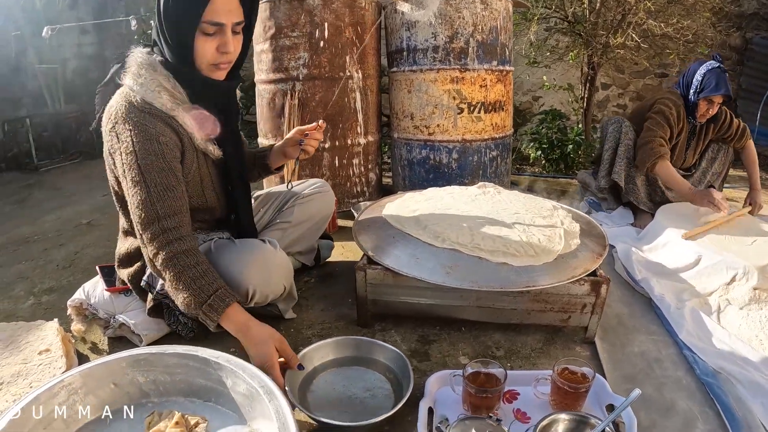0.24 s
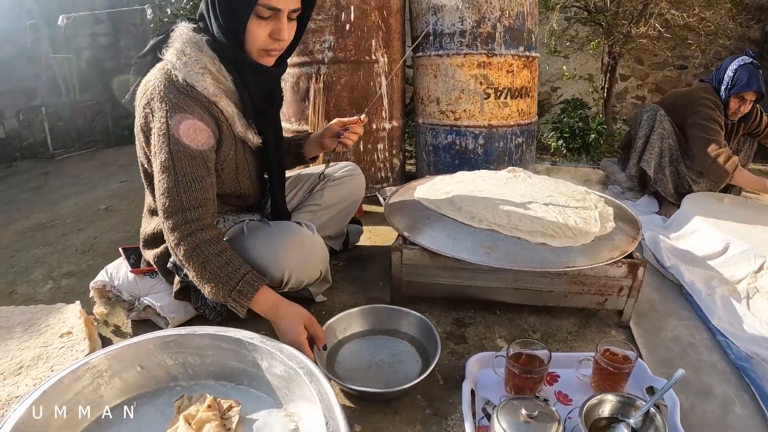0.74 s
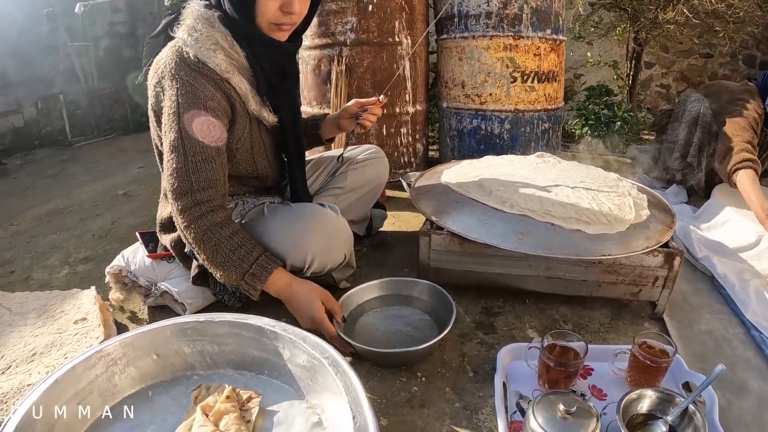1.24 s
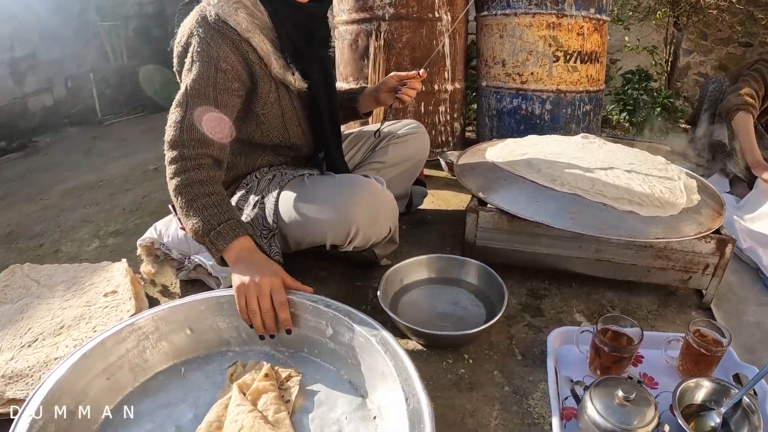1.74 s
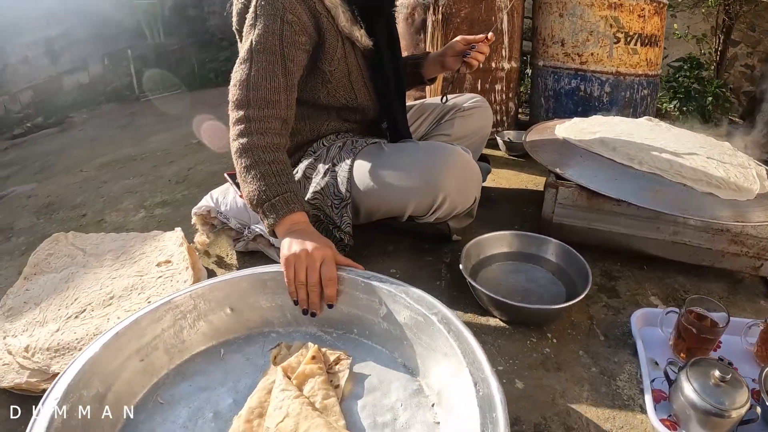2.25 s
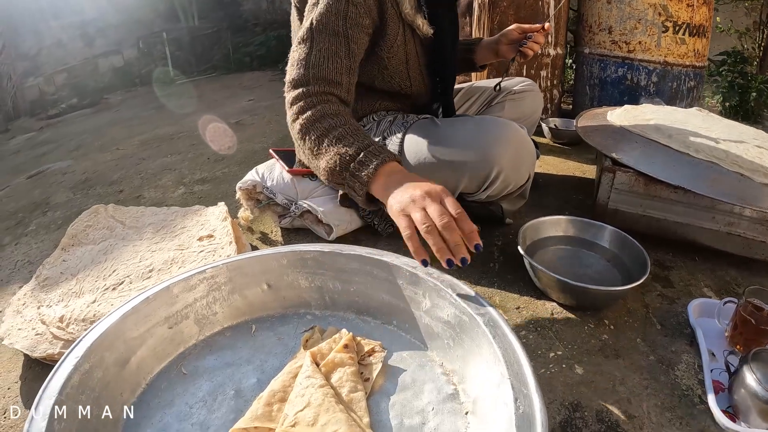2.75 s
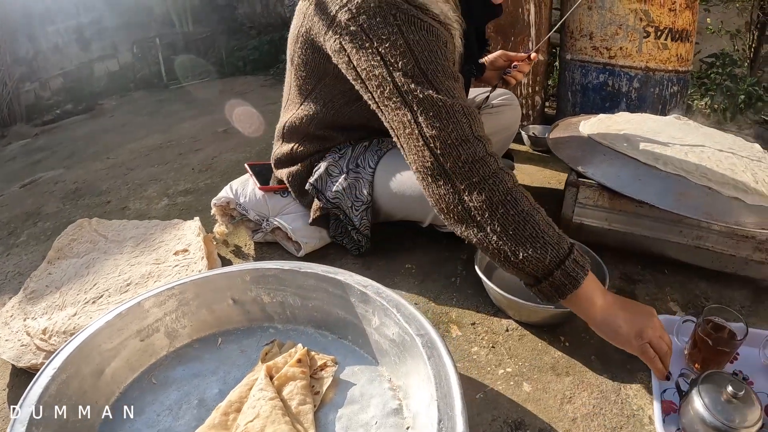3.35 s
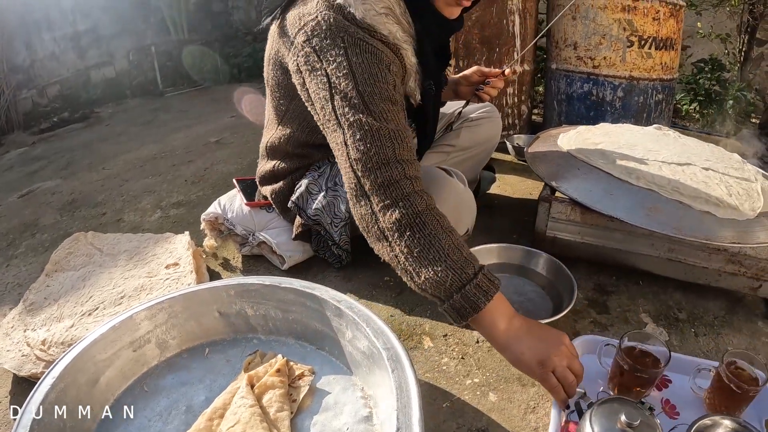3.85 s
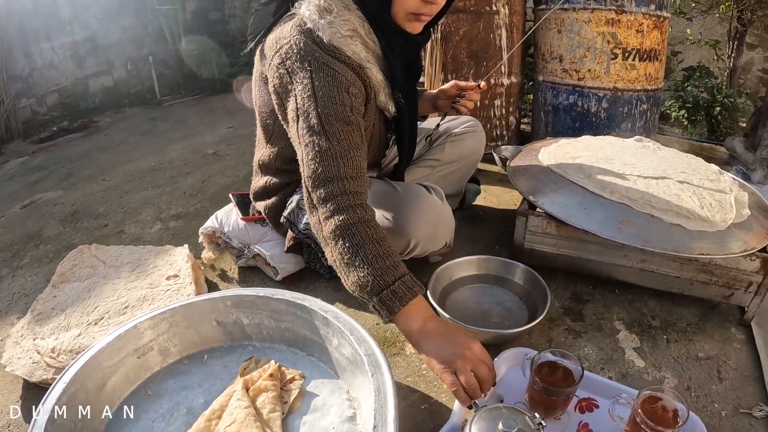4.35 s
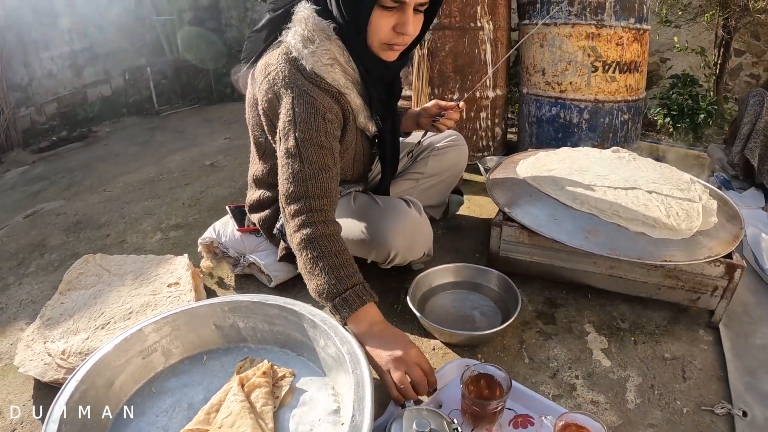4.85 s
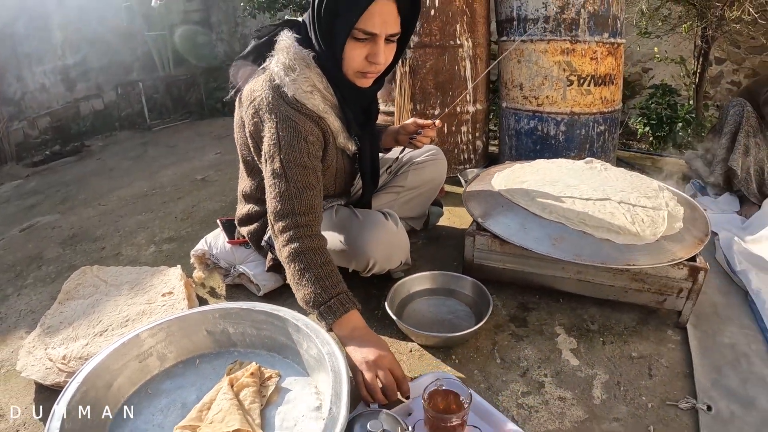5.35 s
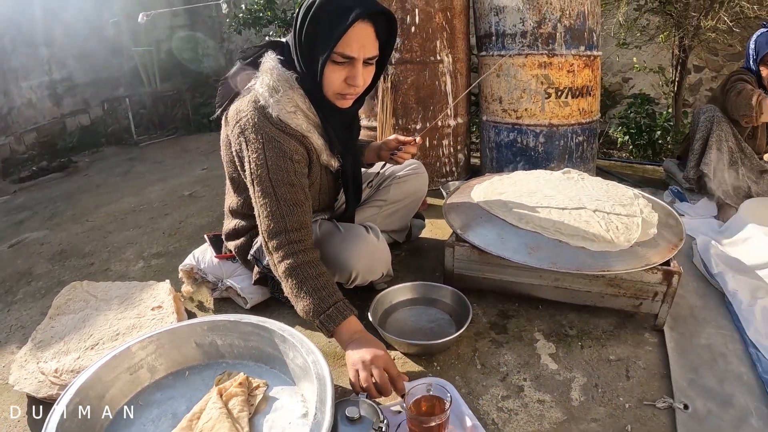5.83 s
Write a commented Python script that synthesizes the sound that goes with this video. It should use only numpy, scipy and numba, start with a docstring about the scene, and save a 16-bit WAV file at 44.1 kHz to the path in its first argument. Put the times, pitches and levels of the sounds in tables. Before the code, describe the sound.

A quiet outdoor yard, heard closely in stereo, with a gas burner's soft hiss gradually fading and an uneven low rumble. From about 0.3 s a thin metal bowl drags over gritty concrete, with bright, ringing catches strongest around 0.65-1.15 s. It lands near 1.2 s with a hollow low clop and brief rumble; a small knock follows at 1.5 s. A faint sleeve or palm brush passes at 1.8-2.05 s. From 2.05 to 2.7 s a wide basin scrapes, lower, broader and rougher, followed by a soft cloth swish around 2.7 s. After a short lull, a tea tray starts moving at 3.3 s, then grates loudly in jerky shoves from 3.6 to 5.2 s, with dull knocks, hollow resonance and thin high edge whistles. Small chirps and ticks come around 5.3 s, a weak scrape follows, and strong rattling scrapes resume from 5.7 s to the end.

```python
"""In a yard beside a gas-fired griddle, a hand drags a metal bowl, then a wide basin, then a tea tray over gritty concrete.
Random grains and sudden catches drive each vessel's broad response and moving resonances; the tray's edge whistles.
Damped low sines make knocks through the ground and dense soft grains a brushing sleeve;
filtered noise makes the burner hiss and low outdoor rumble."""
import sys
import numpy as np
from scipy import signal
from scipy.fft import rfft, irfft
from scipy.io import wavfile
from scipy.ndimage import uniform_filter1d
from numba import njit

SR = 44100
rng = np.random.default_rng(int(sys.argv[2]) if len(sys.argv) > 2 else 0)


def put_to_file(sound):
    """Save the sound as 16-bit audio at rate SR, in the file named by the first command-line argument."""
    columns = np.atleast_2d(sound).T  # one column per channel
    safe = np.clip(columns, -1, 1)
    whole_steps = np.round(safe * 32767)
    wavfile.write(sys.argv[1], SR, whole_steps.astype(np.int16))


N = 268569
TIME = np.arange(N) / SR


def undb(db):
    """Amplitude factor of a level in dB."""
    return 10 ** (np.asarray(db) / 20)


def unit(x):
    """Scales to rms 1."""
    return x / np.sqrt(np.mean(x ** 2))


def noise():
    """White noise, one value per sample."""
    return rng.standard_normal(N)


def band(x, lo_hz, hi_hz):
    """Keeps the band between two frequencies."""
    return signal.sosfilt(signal.butter(2, [lo_hz, hi_hz], "bandpass", fs=SR, output="sos"), x)


def low_pass(x, hz):
    """Gentle first-order low-pass."""
    return signal.lfilter(*signal.butter(1, hz, fs=SR), x)


def curves(table):
    """Fade in dB (0 inside the table, down 60 in 20 ms outside) and the columns at every sample."""
    s, *columns = np.transpose(table)
    fade_db = np.interp(TIME, [s[0] - .02, s[0], s[-1], s[-1] + .02], [-60, 0, 0, -60])
    return fade_db, [np.interp(TIME, s, column) for column in columns]


def colour(x, points, modes=(), size=8192):
    """Causal minimum-phase filter: gain through (Hz, dB) points, with resonances or dips (Hz, width Hz, dB)."""
    hz = np.maximum(np.arange(size // 2 + 1) * SR / size, 1)
    points_hz, points_db = np.transpose(points)
    gain = undb(np.interp(np.log(hz), np.log(points_hz), points_db))
    for mode_hz, width_hz, db in modes:
        gain = gain * np.sqrt(1 + (undb(2 * db) - 1) / (1 + (2 * (hz - mode_hz) / width_hz) ** 2))
    # folding the cepstrum makes the response causal
    cepstrum = irfft(np.log(gain))
    cepstrum[1:size // 2] *= 2
    cepstrum[size // 2 + 1:] = 0
    response = irfft(np.exp(rfft(cepstrum)))[:size // 2]
    return signal.fftconvolve(x, response)[:N]


def walk(rate_hz):
    """Random levels held 1 / rate_hz seconds and slewed; rms 1."""
    hold = int(SR / rate_hz)
    levels = rng.standard_normal(N // 100)
    return unit(uniform_filter1d(levels[np.arange(N) // hold], hold))


def burst(s, t60_s, rise_s):
    """Quick rise at s, exponential fall, at most 0.4 s long."""
    span = slice(int(s * SR), int((s + .4) * SR))
    t = np.maximum(TIME[span] - s, 0)
    out = np.zeros(N)
    out[span] = (1 - np.exp(-t / rise_s)) * 1000 ** (-t / max(t60_s, .005))
    return out


def burst_power(s, db, t60_s, rise_s):
    """Power of one burst; powers of overlapping bursts add."""
    return (undb(db) * burst(s, t60_s, rise_s)) ** 2


def grit(per_s, spread_db, patchy_db):
    """Grains crushed at random moments, sizes spread exponentially in dB, in uneven patches."""
    size_db = spread_db * np.minimum(rng.exponential(size=N), 3.5)
    struck = rng.random(N) < per_s / SR
    grains = struck * noise() * undb(size_db)
    patches = 1.4 * np.minimum(walk(55), .8) + 1.2 * walk(150)
    return unit(grains * undb(patchy_db * patches))


def scatter(x, t60_s, rate_hz, count=3):
    """Dense decaying response that changes as things move: x is shared out among several random tails."""
    t = TIME[:6000]
    tails = rng.standard_normal((count, len(t))) * 1000 ** (-t / t60_s)
    shares = np.array([walk(rate_hz) for _ in tails])
    shares = shares / np.linalg.norm(shares, axis=0)
    return sum(signal.fftconvolve(share * x, tail / np.linalg.norm(tail))[:N]
               for share, tail in zip(shares, tails))


def wander(x, db, rate_hz):
    """The contact point moves, so each octave of the force swells on its own."""
    out = 0
    for hz in 400 * 2. ** np.arange(5):
        low = low_pass(x, hz)
        out = out + undb(db * np.tanh(walk(rate_hz))) * low
        x = x - low
    return out + undb(db * np.tanh(walk(rate_hz))) * x


@njit
def glide(x, hz, width):
    """Band-pass whose centre moves; gain 1 at the centre."""
    y, b, l = np.empty(len(x)), 0., 0.
    for i in range(len(x)):
        g, k = np.tan(np.pi * hz[i] / SR), width / hz[i]
        v = (b + g * (x[i] - l)) / (1 + g * (g + k))
        b, l, y[i] = 2 * v - b, l + 2 * g * v, k * v
    return y


BEND_WIDTHS = 0.86  # rms drift of each mode, in its own widths
HOLLOW_WIDTH_HZ, HOLLOW_DB, HOLLOW_FLUTTER_RATIO = 48., -5, 0.038


def resound(push, body, modes, free_db, shift_db, hollow):
    """Broad radiation plus modes; as the contact point moves each mode is driven more or less and bends a little."""
    rung = 0
    for hz, width_hz, db in modes:
        drive = push * undb(free_db + shift_db * np.tanh(walk(24.15)))
        centre_hz = hz + BEND_WIDTHS * width_hz * walk(9)
        rung = rung + (undb(db) - 1) * glide(drive, centre_hz, float(width_hz))
    if hollow:
        centre_hz = np.interp(TIME, *np.transpose(hollow)) * (1 + HOLLOW_FLUTTER_RATIO * walk(30))
        rung = rung + glide(push * undb(free_db + HOLLOW_DB), centre_hz, HOLLOW_WIDTH_HZ)
    return colour(push + rung, body)


def force(level, lift_db, grains):
    """A sharper contact puts more of the grains' force in the treble."""
    soft = low_pass(grains, 3500)
    return level * (soft + undb(lift_db) * (grains - soft))


SNAP_DB, SNAP_T60_S = 3.5, 0.0055  # snap opening each catch, dB over the catch


def drag(rasp, catches, body, modes, spread_db, patchy_db, wander_db, edge_db, rise, ring_db, ring_t60_s, shift_db,
         hollow=()):
    """Steady rasp and sudden catches of grit drive a metal body; rise is a share of each catch's t60."""
    rasp_db, sharp_db, free_db = rasp
    power = np.zeros(N)
    for s, db, t60_s in catches:
        power += burst_power(s, db, t60_s, rise * t60_s)
        power += burst_power(s, db + SNAP_DB, SNAP_T60_S, .0002)
    rub = grit(6000, spread_db, patchy_db)
    rasping = force(undb(rasp_db), sharp_db, rub)
    catching = force(np.sqrt(power), sharp_db + edge_db, grit(14000, 1.6, 1.0))
    push = wander(rasping + catching, wander_db, rate_hz=18)
    # the thin sheet's many small modes blur into a short metallic ring
    push = push + undb(ring_db) * scatter(push, ring_t60_s, rate_hz=7)
    body_gain = np.std(colour(rub, body, modes))
    return resound(push, body, modes, free_db, shift_db, hollow) / body_gain


def pull(table):
    """Rasp dB, sharpness dB and freedom to ring dB of one long pull."""
    fade_db, (db, sharp_db) = curves(table)
    return db + fade_db, sharp_db, 0


def shove(start_s, end_s, first_db, last_db, start_db_per_s=200, stop_db_per_s=224):
    """Power of one movement: it builds up, slides from one level to the other and dies away."""
    db = np.interp(TIME, [start_s, end_s], [first_db, last_db])
    db = db - start_db_per_s * np.maximum(start_s - TIME, 0) - stop_db_per_s * np.maximum(TIME - end_s, 0)
    return undb(2 * db)


def shoves(table):
    """Rasp dB, sharpness dB and freedom dB of a row of shoves; louder shoves weigh more in the last two."""
    power = np.array([shove(*row[:4]) for row in table])
    total = power.sum(axis=0)
    sharp_db, free_db = np.transpose(table)[4:] @ power / total
    return 10 * np.log10(total), sharp_db, free_db


# Burner hiss falling away. Each row: time in seconds, level in dB.
BURNER = [(0, -47.5), (1.7, -51), (3, -53.5), (5.5, -57), (6.09, -63)]
# Hiss spectrum. Each row: frequency in Hz, relative density in dB per Hz.
HISS = [(150, -28.5), (250, -1), (376, -15), (754, -21.5), (1300, -9.5), (2280, -17.5), (3310, -16),
        (3540, -17), (8280, -25), (9170, -16), (10300, -36), (14500, -39)]
# Hiss resonances and a dip. Each row: centre in Hz, width in Hz, gain in dB.
HISS_MODES = [(934, 31, 12.5), (1455, 280, 7), (8440, 1850, -9.5)]
# Low outdoor rumble. Each row: time in seconds, ground level in dB, deep level in dB.
RUMBLE = [(0, -54.5, -48), (.46, -48, -44), (.86, -35, -41), (1.4, -44, -46), (2.07, -44.5, -47),
          (2.37, -57, -29), (2.83, -50, -47), (3.5, -47.5, -44.5), (4.04, -46.5, -52), (5.45, -53, -51),
          (6.09, -56, -45)]


def yard():
    """Burner hiss and low rumble from coloured noise; hiss and deep rumble partly unlike left and right."""
    _, (ground_db, deep_db) = curves(RUMBLE)
    apart = np.array([[1], [-1]])
    mid, side = (unit(colour(noise(), HISS, HISS_MODES)) for _ in range(2))
    hiss_db = np.interp(TIME, *np.transpose(BURNER)) + 0.058 * walk(1.9)
    hiss = undb(hiss_db) * (mid + 0.43 * side * apart)
    ground = undb(ground_db + 2.0 * walk(18)) * unit(band(noise(), 99.0, 204))
    mid, side = (unit(band(noise(), 27.6, 82.4)) for _ in range(2))
    deep = undb(deep_db + 2.5 * walk(6)) * (mid + .08 * side * apart)
    return hiss + ground + deep


# Steady rasp. Each row: time in seconds, drive in dB, sharpness as treble lift in dB.
BOWL_DRAG = [(.3, -52.5, -18), (.6, -51, -14.5), (.8, -46, -19.5), (.9, -43.5, -11.5), (1.15, -37.5, -6.5),
             (1.27, -49.5, -5), (1.56, -99, -23)]
# Grit catches and lets go. Each row: start in seconds, drive in dB, t60 in seconds.
BOWL_CATCH = [(0.482, -33, 0.021), (.619, -36, 0.51), (0.665, -22.5, 0.079), (0.731, -26, 0.064),
              (0.841, -37, 0.32), (0.892, -26, 0.12), (0.965, -36.5, 0.03), (1.01, -26.5, 0.046),
              (1.106, -30.5, 0.043), (1.136, -27, 0.13), (1.459, -36.5, 0.11)]
# Broad radiation. Each row: frequency in Hz, relative gain in dB.
BOWL = [(290, -48), (500, -23), (665, -6.5), (859, -3), (4410, -6), (7470, -7), (15000, -30)]
# Body modes. Each row: centre in Hz, width in Hz, nominal gain over the broad part in dB.
BOWL_MODES = [(665.6, 4.8, 20.7), (1175, 13, 13.7), (1522, 35, 15), (2020, 28, 12.8), (2267, 45, 11),
              (2936, 96, 14), (3570, 31, 15), (4040, 90, 13.5), (4520, 110, 11), (5300, 39, 7.9),
              (6030, 43, 5), (7360, 110, 11)]


def bowl():
    """One long pull over grit rings the bowl's narrow modes."""
    return drag(pull(BOWL_DRAG), BOWL_CATCH, BOWL, BOWL_MODES, spread_db=2.5, patchy_db=2.5, wander_db=2.0,
                edge_db=14.5, rise=0.046, ring_db=-8.0, ring_t60_s=0.21, shift_db=8.0)


# Knocks through the ground. Each row: start in seconds, level before the rise in dB, pitch in Hz, t60 in seconds.
THUDS = [(0.491, -23.5, 164, 0.05), (0.672, -11, 150, 0.062), (1.012, -11, 160.4, 0.078),
         (1.179, 10.5, 203, 0.026), (1.496, -14.5, 141, 0.07), (2.407, -9.5, 220, 0.047),
         (2.604, -22, 61.3, 0.22), (2.888, -28, 60, 0.21), (3.79, -14.5, 149, 0.057),
         (3.871, -1, 226, 0.024), (5.165, -15.5, 161, 0.067)]
# Bowl's base lands, then rumbles. Each row: start in seconds, level before the rise in dB, t60 in seconds,
# band low in Hz, band high in Hz.
SET_DOWN = [(1.176, -18.5, 0.097, 406, 850), (1.19, -20, 0.38, 112, 244)]


def thuds():
    """Each knock is a damped low swing; the bowl adds a hollow clop and rumble of band noise as it settles."""
    out = np.zeros(N)
    for s, db, hz, t60_s in THUDS:
        out += undb(db) * burst(s, t60_s, 0.0081) * np.sin(2 * np.pi * hz * (TIME - s))
    for s, db, t60_s, lo_hz, hi_hz in SET_DOWN:
        out += undb(db) * burst(s, t60_s, 0.032 * t60_s) * unit(band(noise(), lo_hz, hi_hz))
    return out


# Strokes of sleeve and palm, one list each. Each row: time in seconds, level in dB.
BRUSH = [
    [(1.78, -80), (1.822, -44), (2.06, -53)],
    [(2.66, -50), (2.724, -39), (2.8, -67)],
]
# Cloth spectrum. Each row: frequency in Hz, relative density in dB per Hz.
CLOTH = [(940, -35), (1600, -16.5), (2970, -9.5), (3290, -10.5), (9220, -26), (15000, -47)]


def brush():
    """Fine fibres sliding: a dense soft hiss."""
    fibres = unit(colour(grit(per_s=24000, spread_db=-0.5, patchy_db=1.5), CLOTH))
    return sum(undb(fade_db + db) * fibres for fade_db, (db,) in map(curves, BRUSH))


# Steady rasp. Each row: time in seconds, drive in dB, sharpness as treble lift in dB.
BASIN_DRAG = [(2.02, -81, 8), (2.14, -47, 12.5), (2.19, -33.5, 14), (2.42, -25, -0.5), (2.54, -29, 7),
              (2.62, -31.5, 4), (2.7, -51, 2)]
# Grit catches and lets go. Each row: start in seconds, drive in dB, t60 in seconds.
BASIN_CATCH = [(2.047, -33, 0.06), (2.086, -31.5, 0.06), (2.208, -23.5, 0.09), (2.249, -17.5, 0.032),
               (2.282, -14, 0.076), (2.324, -16, 0.29), (2.347, -12.5, 0.022), (2.405, -15.5, 0.15),
               (2.46, -14, 0.046), (2.492, -23.5, 0.043), (2.574, -16.5, 0.034), (2.593, -20.5, 0.064)]
# Broad radiation. Each row: frequency in Hz, relative gain in dB.
BASIN = [(88, -78), (150, -5.5), (416, 4.5), (567, -5.5), (1510, -8.5), (7500, -32), (15000, -62)]
# Body modes. Each row: centre in Hz, width in Hz, nominal gain over the broad part in dB.
BASIN_MODES = [(211, 31, 4.8), (934, 88, 11.5), (1514, 165, 8.6), (2633, 93, 12.5), (3080, 340, 8),
               (3740, 60, 8.5), (4180, 150, 5.5)]


def basin():
    """One pull over grit rings the wide basin's broader, lower body."""
    return drag(pull(BASIN_DRAG), BASIN_CATCH, BASIN, BASIN_MODES, spread_db=3.0, patchy_db=2.0, wander_db=1.0,
                edge_db=1, rise=0.034, ring_db=-10, ring_t60_s=0.17, shift_db=3.5)


# Shoves. Each row: full from in seconds, full until in seconds, first drive in dB, last drive in dB,
# sharpness as treble lift in dB, freedom to ring in dB.
TRAY_SHOVES = [(3.35, 3.54, -63, -38.5, -3, -12), (3.63, 3.915, -28, -25, 1.5, -20),
               (3.985, 4.235, -23, -22.5, -0.5, -8), (4.3, 4.72, -33, -30.5, -1, -18),
               (4.86, 5.22, -22, -21.5, -4, 5), (5.34, 5.56, -51, -53, -8, -8),
               (5.7, 5.76, -26, -28.5, -8.5, 13.5), (5.88, 6.09, -24, -33, -15, 13.5)]
# Grit catches and lets go. Each row: start in seconds, drive in dB, t60 in seconds.
TRAY_CATCH = [(3.296, -32, 0.13), (3.396, -36.5, 0.1), (3.595, -27, 0.036), (3.633, -19, 0.046),
              (3.688, -18.5, 0.2), (3.788, -16.5, 0.11), (3.803, -11, 0.016), (3.834, -15.5, 0.025),
              (3.868, -13, 0.024), (3.892, -10, 0.066), (3.93, -23, 0.015), (3.952, -14.5, 0.026),
              (3.978, -17, 0.051), (3.987, -13.5, 0.06), (4.044, -21.5, 0.054), (4.134, -15.5, 0.061),
              (4.227, -11, 0.02), (4.19, -20.5, .1), (4.28, -16, 0.088), (4.309, -16, 0.057),
              (4.375, -9, 0.018), (4.397, -10.5, 0.02), (4.45, -25, 0.23), (4.48, -12.5, 0.03),
              (4.503, -22.5, 0.16), (4.542, -11.5, 0.038), (4.572, -14.5, 0.063), (4.608, -18, 0.11),
              (4.622, -12, 0.12), (4.755, -12.5, 0.051), (4.806, -16, 0.11), (4.837, -15.5, 0.014),
              (4.901, -14, 0.058), (5.153, -24, 0.13), (5.368, -36, 0.038), (5.428, -21.5, 0.093),
              (5.474, -25, 0.049), (5.514, -36.5, 0.092), (5.611, -34, .03), (5.72, -15, 0.081),
              (5.774, -12.5, 0.031), (5.822, -20, 0.065), (5.856, -16, 0.14), (5.873, -12, 0.041),
              (5.891, -15, 0.083), (5.931, -9, 0.034), (5.974, -14, 0.031), (5.994, -16, 0.072),
              (6.014, -15, 0.029), (6.043, -15, 0.054), (6.075, -22, 0.036)]
# Broad radiation. Each row: frequency in Hz, relative gain in dB.
TRAY = [(88, -45), (150, -24), (267, -10.5), (357, -12), (701, -8), (818, -9), (1130, 0.5), (4200, -15),
        (7640, -25.5), (10700, -38.5), (12600, -40.5), (15000, -58)]
# Body mode. Each row: centre in Hz, width in Hz, nominal gain over the broad part in dB.
TRAY_MODES = [(288, 8.9, 3.4)]
# Hollow under the tray, higher or lower as it tilts. Each row: time in seconds, centre before flutter in Hz.
TRAY_HOLLOW = [(3.5, 980), (3.75, 1050), (4.1, 1280), (4.8, 1240), (5.05, 1100), (5.22, 1000), (5.45, 1050),
               (5.72, 1103), (6.09, 1000)]


def tray():
    """Shoves over grit ring the tray's body and the hollow beneath it."""
    return drag(shoves(TRAY_SHOVES), TRAY_CATCH, TRAY, TRAY_MODES, spread_db=1.94, patchy_db=1.0, wander_db=2.2,
                edge_db=5.0, rise=0.058, ring_db=-10.0, ring_t60_s=0.038, shift_db=7.5, hollow=TRAY_HOLLOW)


# One tray edge skims the ground and whistles. Each row: full from in seconds, full until in seconds,
# first level in dB, last level in dB, band low in Hz, band high in Hz.
TRAY_SKIMS = [(3.65, 4.378, -31, -39.5, 2700, 3700), (4.46, 5.073, -47, -42, 3380, 3800),
              (5.163, 5.3, -32, -44, 3550, 3730), (5.674, 5.81, -35.5, -43, 3400, 3870)]
# Edge ticks as the tray comes to rest between shoves. Each row: start in seconds, level in dB, t60 in seconds.
EDGE_CHIRPS = [(5.254, -30, .08), (5.313, -36, 0.056), (5.338, -32.5, 0.047)]
OVERTONE_DB = -21.5


def skim():
    """Fine grit under the light edge rings one mode and, faintly, its overtone, in whistles and short chirps."""
    grains = grit(per_s=5000, spread_db=1.8, patchy_db=1.8)
    chirp = np.sqrt(sum(burst_power(s, db, t60_s, .0005) for s, db, t60_s in EDGE_CHIRPS))
    whistles = [np.sqrt(shove(*row[:4], start_db_per_s=760, stop_db_per_s=851.2)) for row in TRAY_SKIMS]
    out = sum(level * unit(band(grains, *row[4:])) for level, row in zip(whistles, TRAY_SKIMS))
    out = out + chirp * unit(band(grains, 3200, 4050))
    overtone = unit(band(grains, 7240, 7750))
    return out + undb(OVERTONE_DB) * (sum(whistles) + chirp) * overtone


# Left minus right for a source straight at the right of the housing. Each row: frequency in Hz, difference in dB.
SHADOW = [(150, 1.5), (1300, -2), (3500, -5), (9000, 1)]


def place(x, side, echo_db, t60_s=0.0081):
    """The housing shades the far port; ground and pots scatter bright echoes unlike at each port."""
    bright = signal.lfilter(*signal.butter(1, 8000, "high", fs=SR), x)
    ports = []
    for sign in (1, -1):
        direct = colour(x, [(hz, sign * side * db / 2) for hz, db in SHADOW])
        ports.append(direct + undb(echo_db) * scatter(bright, t60_s, rate_hz=14))
    return np.array(ports)


def scene():
    """Places the three vessels to the side and adds knocks and yard."""
    return (yard() + place(bowl(), side=0.74, echo_db=-1.0) + thuds()
            + place(brush() + basin(), side=0.58, echo_db=-1.5)
            + place(tray() + skim(), side=0.93, echo_db=-1.0))


def record(dry, ceiling=0.6):
    """The left port lags by one sample below the top octaves; loud peaks are rounded and the top is cut."""
    hz = np.arange(N // 2 + 1) * SR / N
    lag = np.exp(-2j * np.pi * hz / SR / (1 + (hz / 6000) ** 4))
    ports = np.array([irfft(rfft(dry[0]) * lag, N), dry[1]])
    rounded = ceiling * np.tanh(ports / ceiling)
    return signal.sosfilt(signal.ellip(10, .2, 80, 15500, fs=SR, output="sos"), rounded)


dry = scene()
out = record(dry)
put_to_file(out)
```